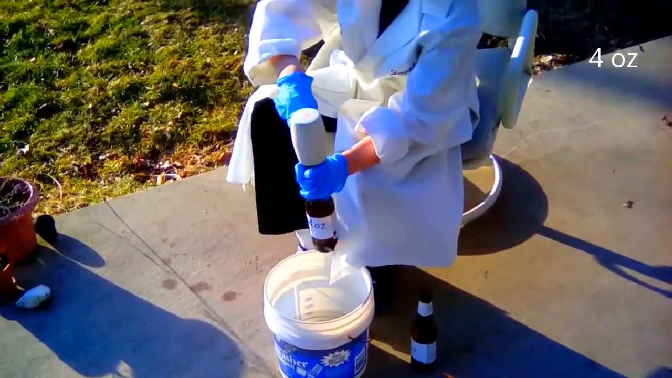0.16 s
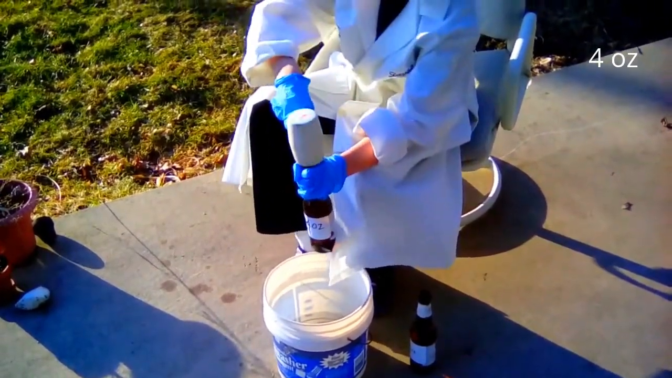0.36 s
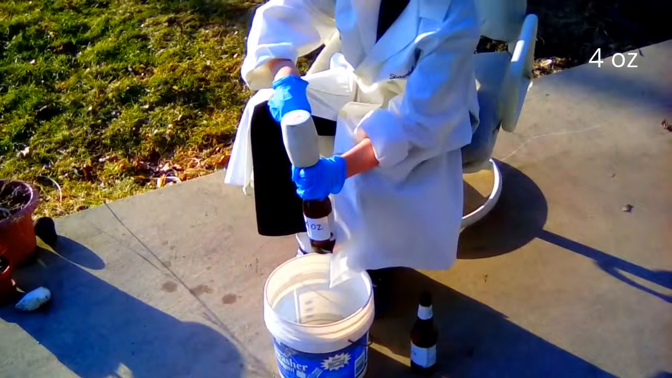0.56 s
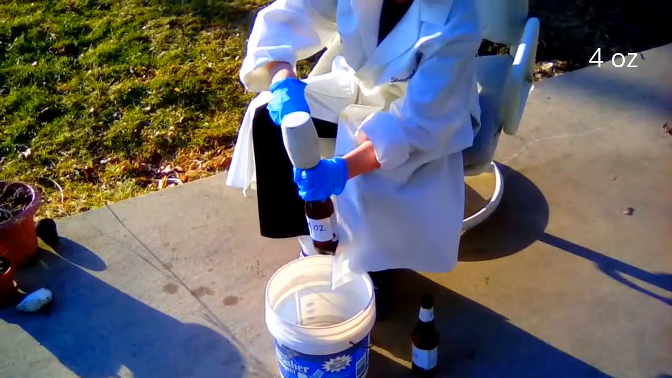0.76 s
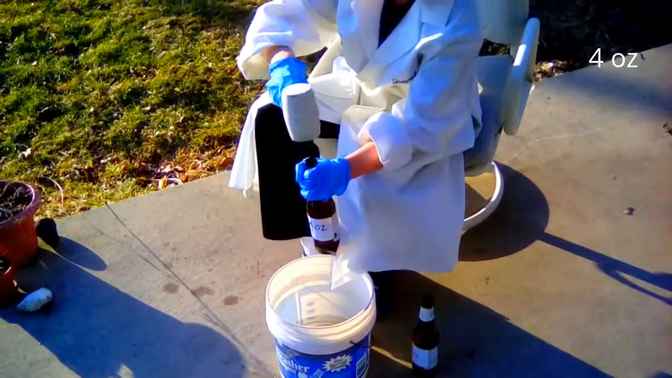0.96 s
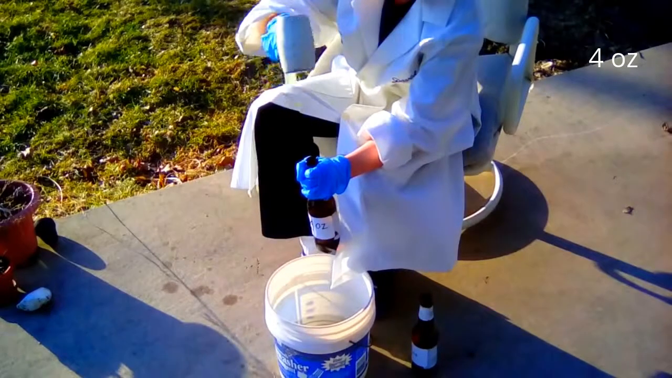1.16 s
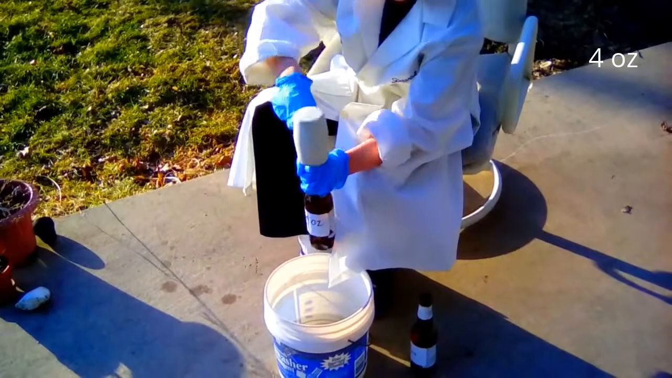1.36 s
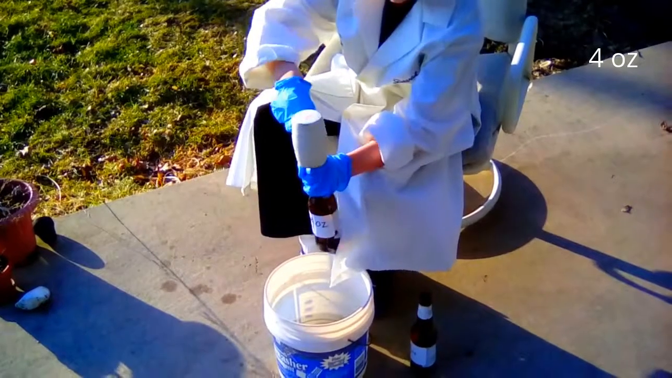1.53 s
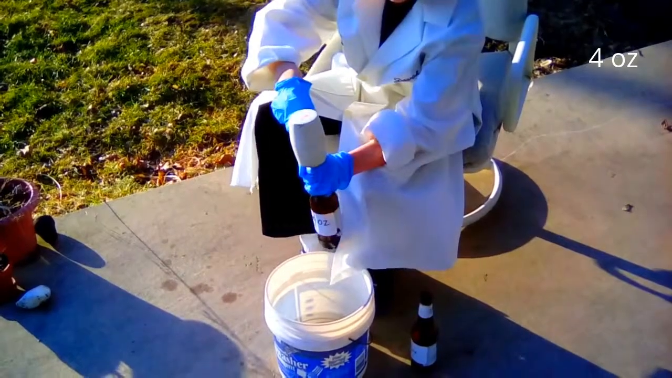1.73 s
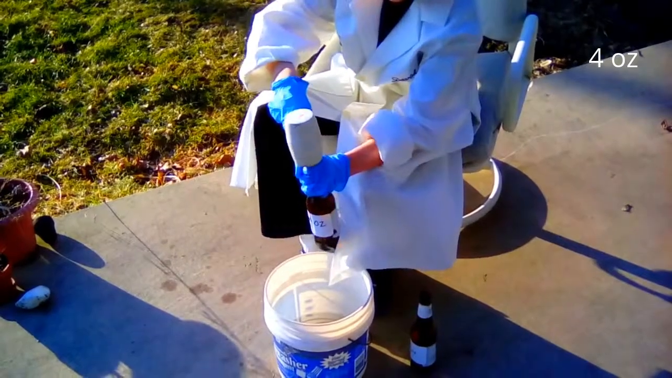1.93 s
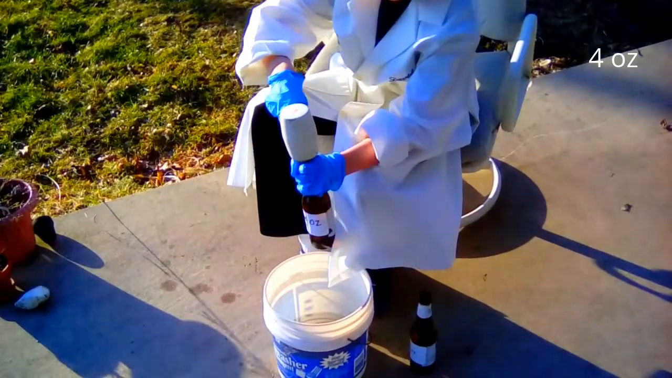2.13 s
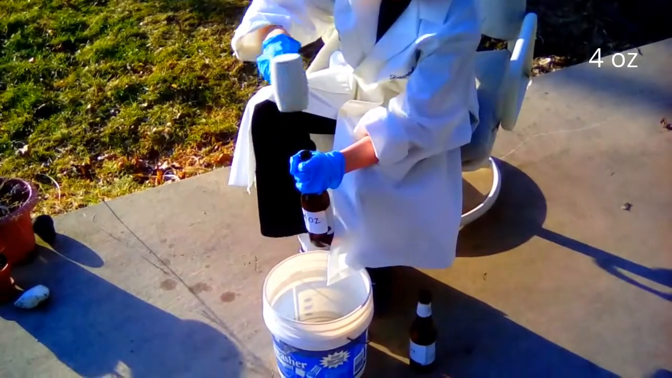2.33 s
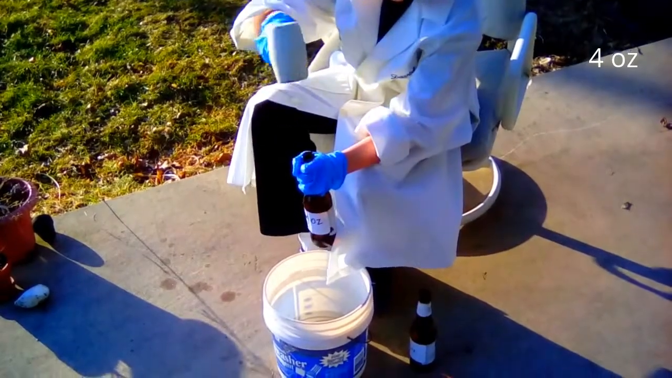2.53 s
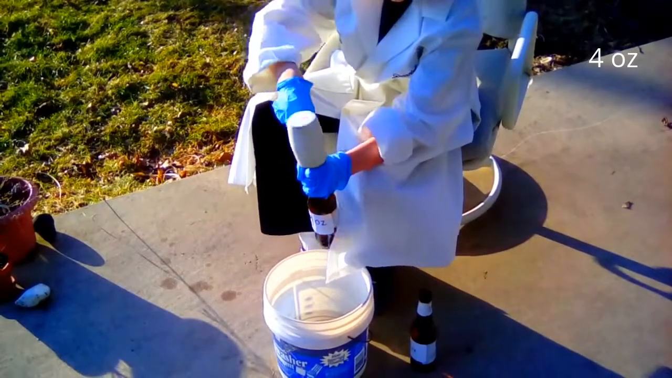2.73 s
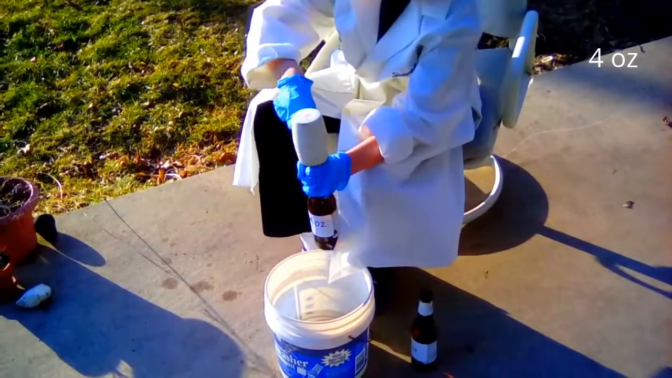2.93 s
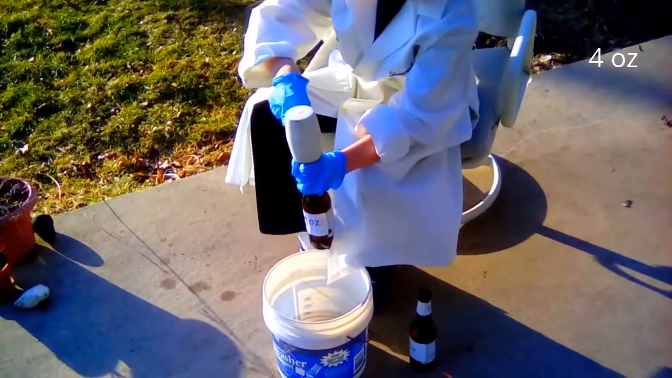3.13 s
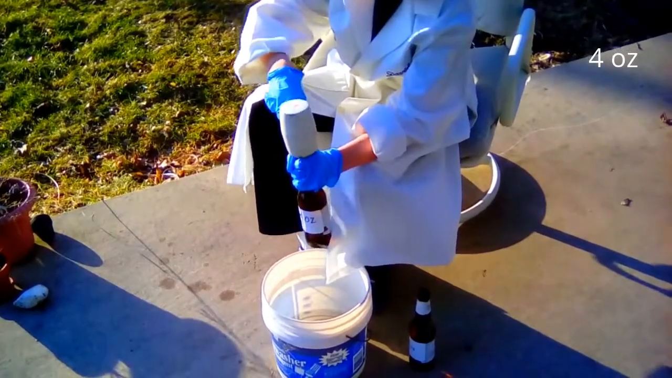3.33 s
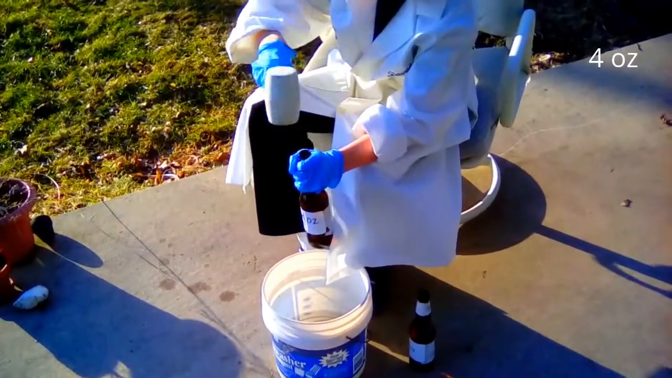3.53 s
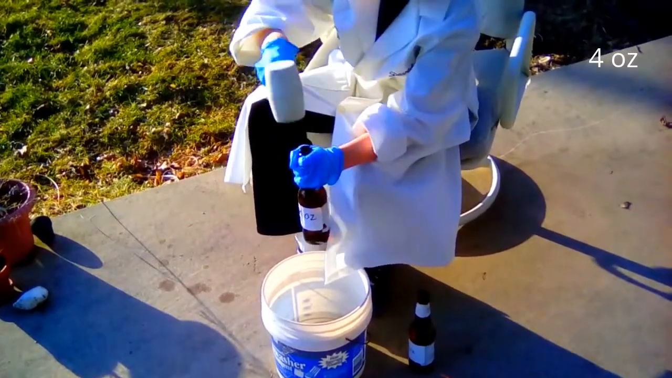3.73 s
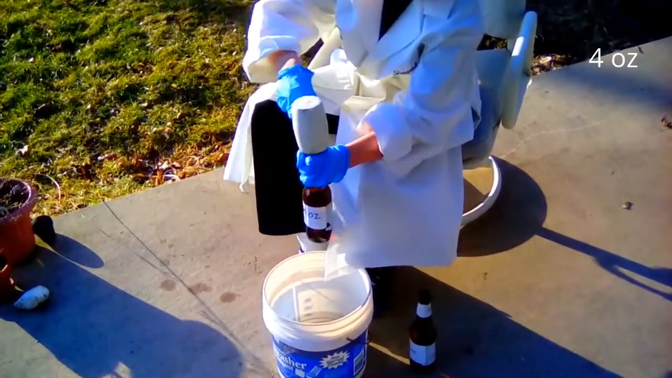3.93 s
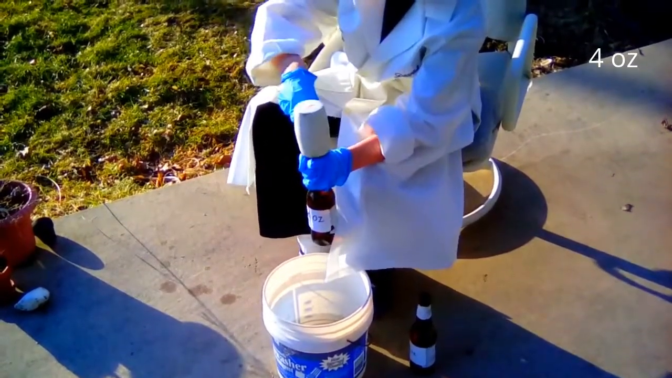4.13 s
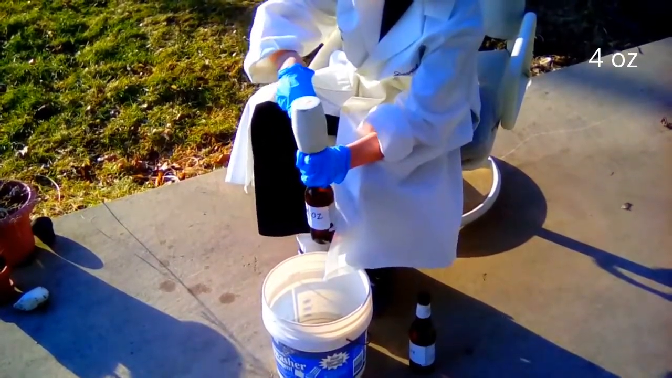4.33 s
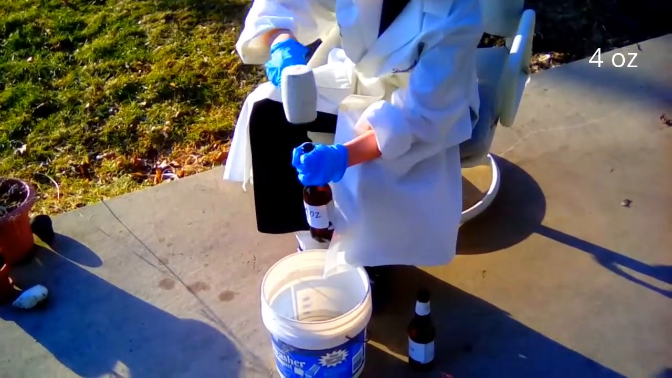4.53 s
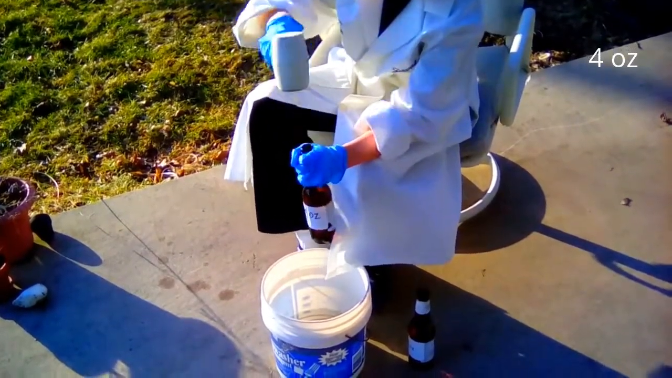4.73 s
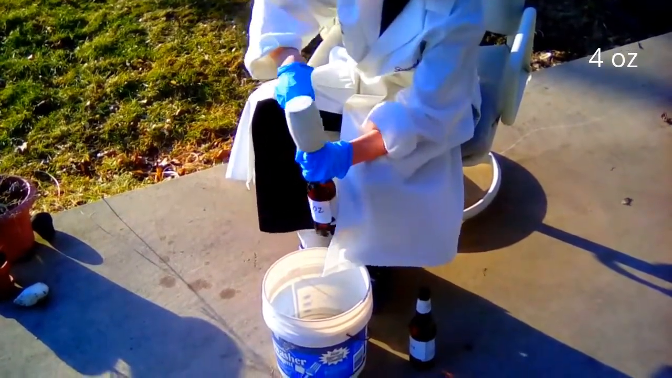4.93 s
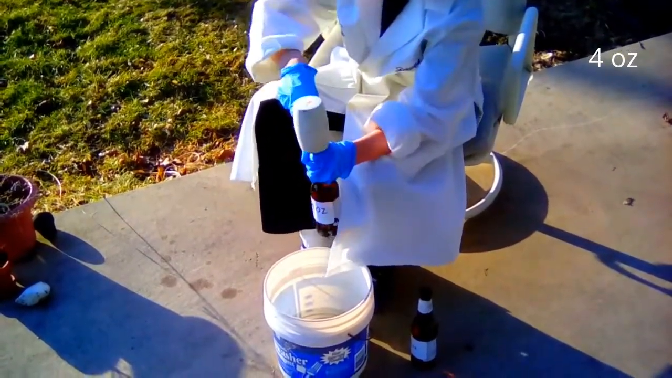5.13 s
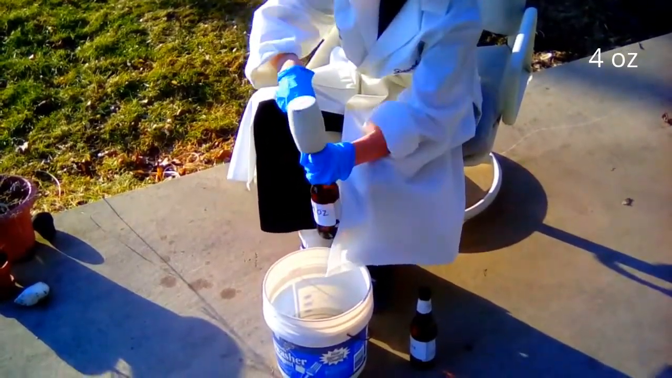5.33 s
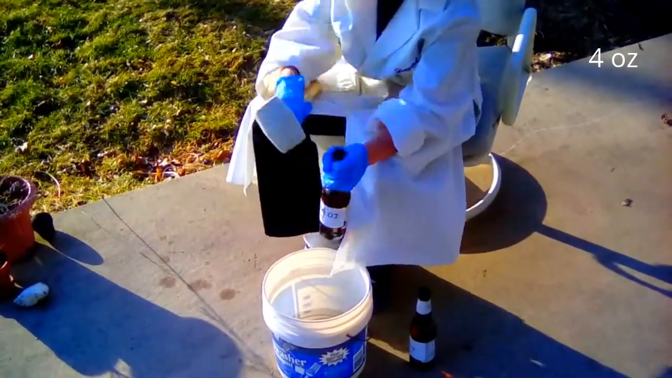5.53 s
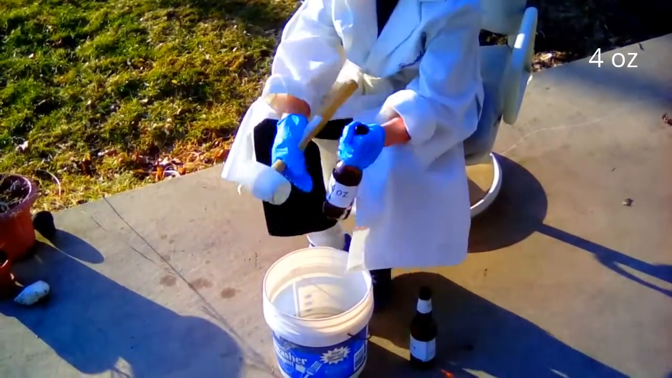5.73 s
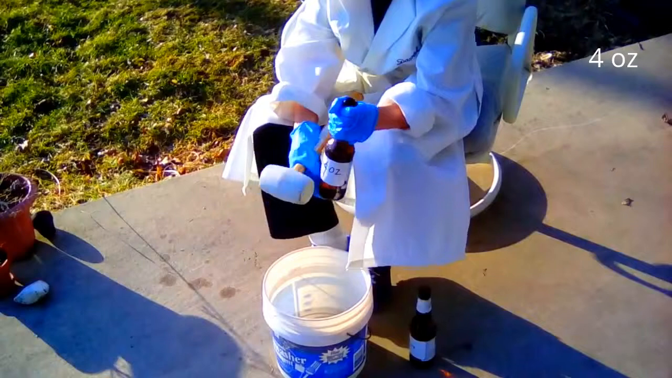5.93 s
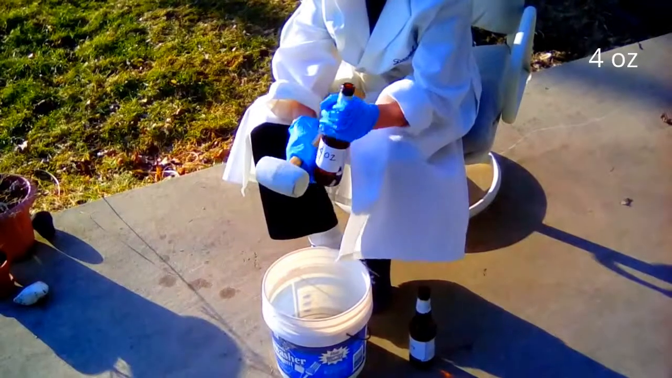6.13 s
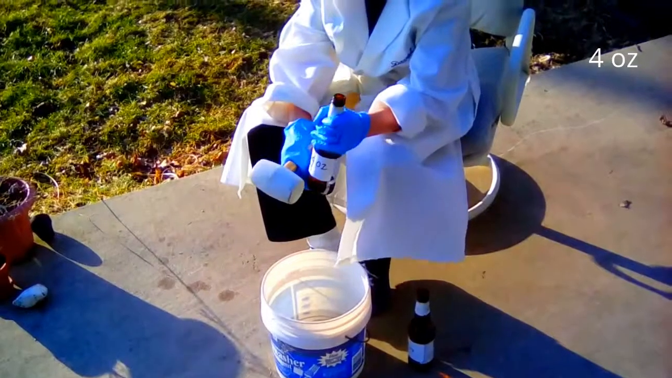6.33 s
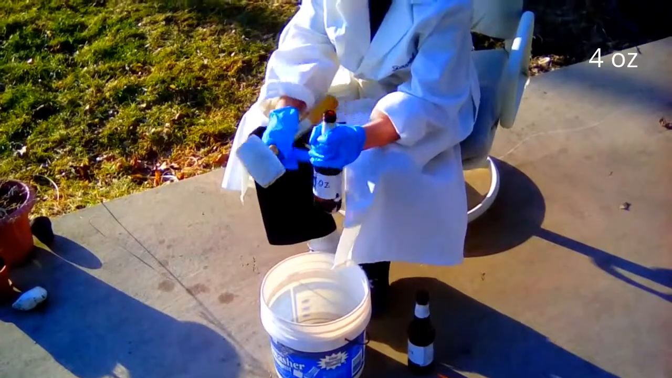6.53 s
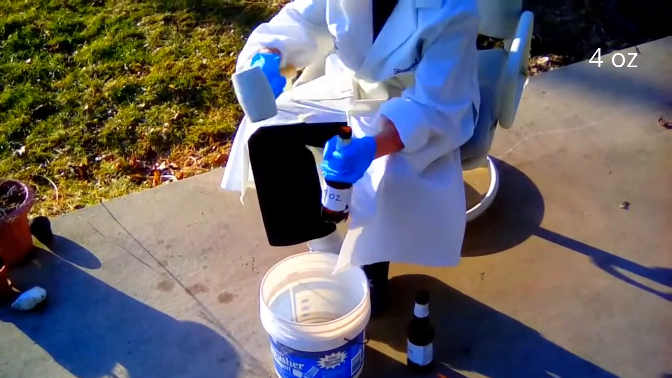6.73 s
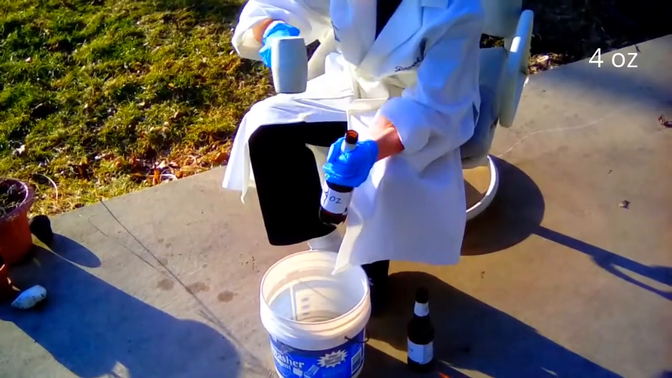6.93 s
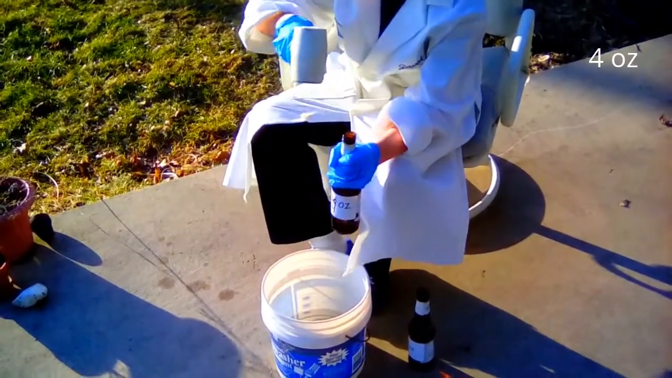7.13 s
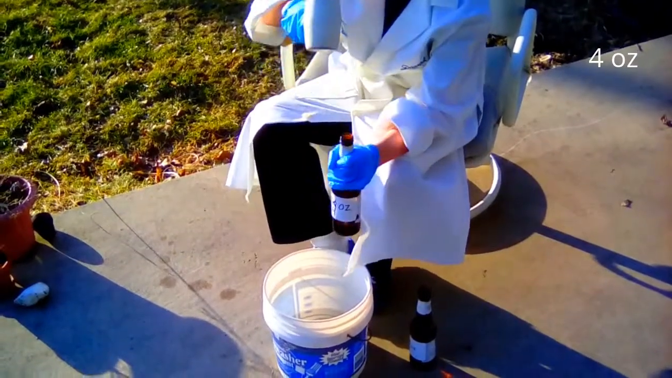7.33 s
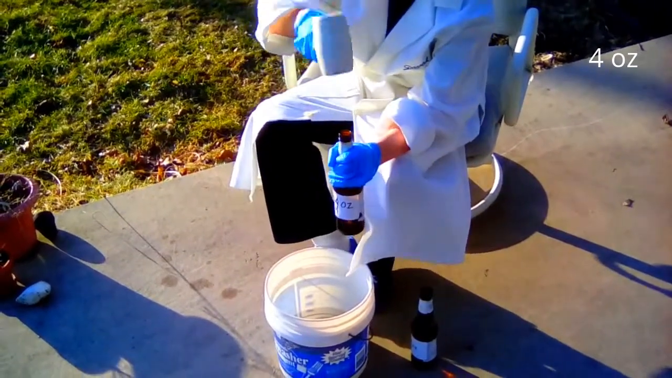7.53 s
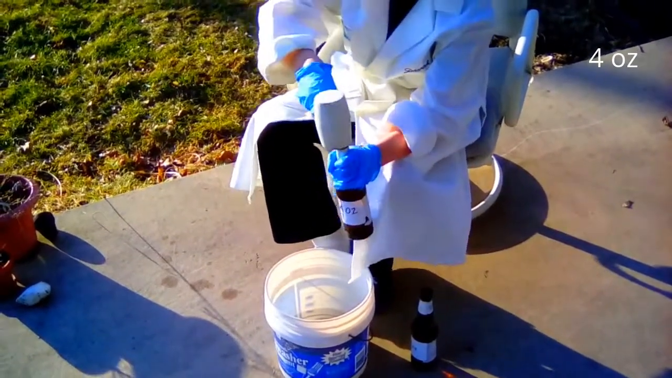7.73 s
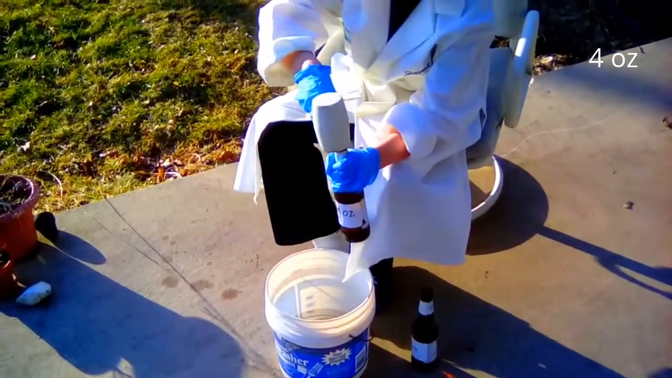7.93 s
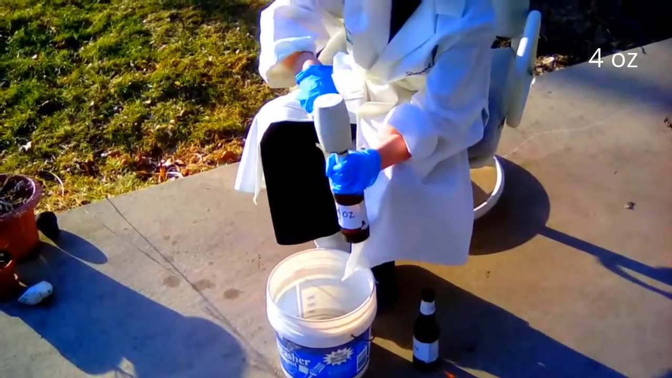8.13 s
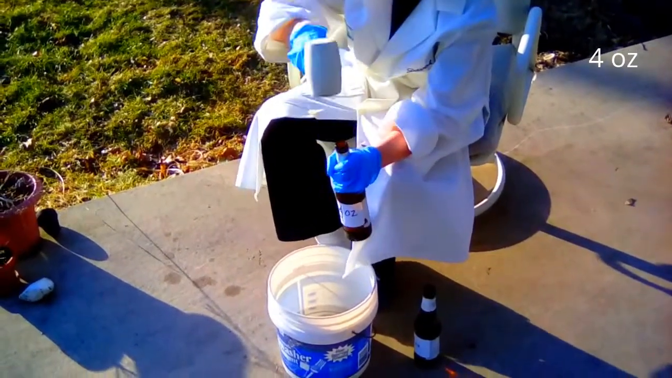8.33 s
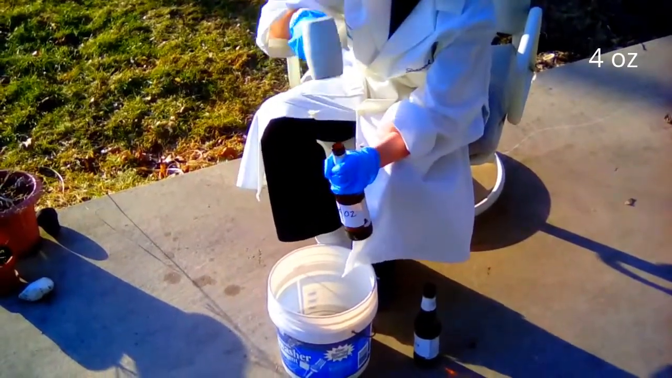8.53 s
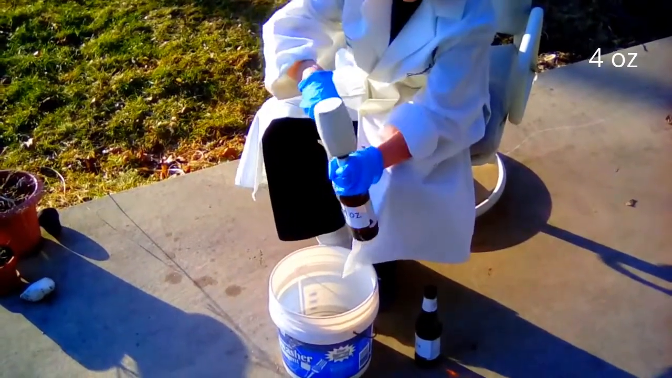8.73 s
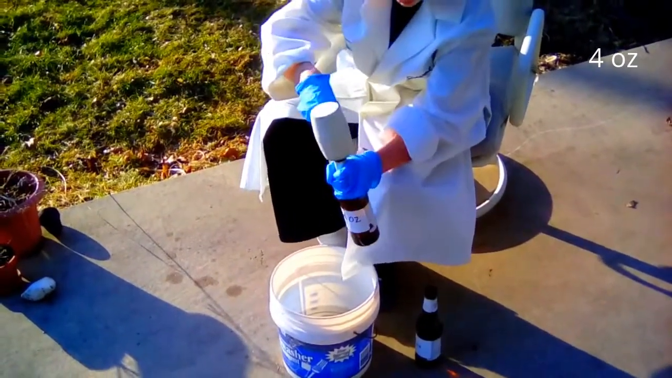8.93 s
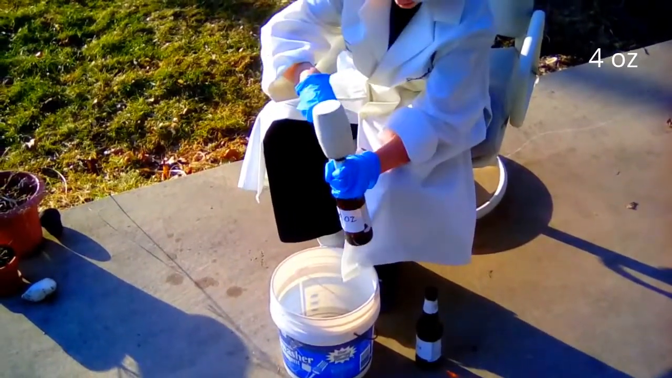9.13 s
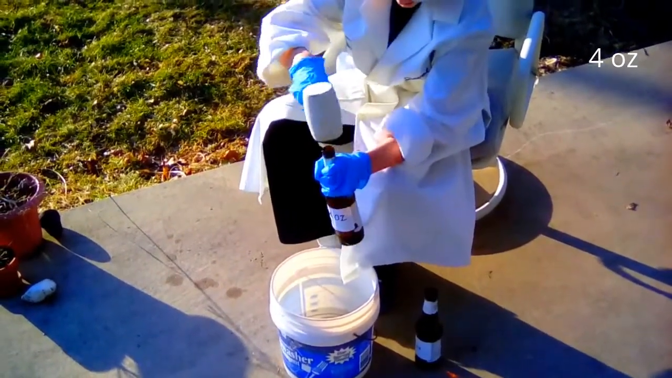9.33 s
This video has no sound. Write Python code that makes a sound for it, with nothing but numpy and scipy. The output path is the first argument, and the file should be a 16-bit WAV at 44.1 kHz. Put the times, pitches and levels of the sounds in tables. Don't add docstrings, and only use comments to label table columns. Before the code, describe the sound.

Spaced mallet knocks on a glass bottle of water crack brightly and ring briefly, with slosh, glove ticks, microphone hiss and fluttering wind.

```python
import sys
import numpy as np
from scipy import signal
from scipy.fft import rfft, irfft
from scipy.io import wavfile

SR = 44100
rng = np.random.default_rng(int(sys.argv[2]) if len(sys.argv) > 2 else 0)


def magnitude_from_level(level_db):
    exponent = np.asarray(level_db, float) / 20
    return 10 ** exponent


def inscribe(sig):
    pcm = np.round(np.clip(np.atleast_2d(sig).T, -1, 1) * 32767)
    wavfile.write(sys.argv[1], SR, pcm.astype(np.int16))


N = 417627


def rms_one(x):
    return x / np.sqrt(np.mean(x ** 2) + 1e-20)


def seconds(length):
    return np.arange(length) / SR


def at_hz(points, hz):
    table_hz, value = np.array(points).T
    return np.interp(np.log(np.maximum(hz, 1)), np.log(table_hz), value)


def coloured(spectrum, size):
    hz = np.fft.rfftfreq(size, 1 / SR)
    white = rfft(rng.standard_normal(size))
    return rms_one(irfft(white * magnitude_from_level(at_hz(spectrum, hz)), size))


def band_filter(order, low, high):
    return signal.butter(order, [low, high], "band", fs=SR, output="sos")


def drift(rate):
    knots = rng.standard_normal(int(N / SR * 40) + 2)
    return np.interp(seconds(N) * rate, np.arange(len(knots)), knots)


def bumps(rows):
    t = seconds(N)
    return sum(magnitude_from_level(db) * np.exp(-((t - s) / length) ** 2) for s, db, length in rows)


def add(out, s, sound):
    i = round(s * SR)
    out[i:i + len(sound)] += sound[:N - i]


def mode(t, hz, db, t60, rise, phase, glide=0):
    shape = (1 - np.exp(-t / max(rise, 1e-4))) * magnitude_from_level(db - 60 * t / t60)
    bend = np.where(t < t60, t * t / t60, 2 * t - t60)
    return shape * np.sin(2 * np.pi * hz * (t + glide * bend) + phase)


def unsteady(t, depth_db, settle):
    flutter = np.interp(t * 90, np.arange(50), rng.standard_normal(50))
    return magnitude_from_level(depth_db * np.minimum(t / settle, 1) * np.clip(flutter, -3, 1))


# time in seconds, flutter level in dB.
GUST = [(0.0, -71), (.3, -69), (.6, -62.5), (.75, -71), (.97, -72.5), (1.1, -61), (1.36, -61.5),
        (1.75, -74), (2.3, -64), (2.6, -77), (3.3, -73), (4.7, -79), (5.1, -69.5), (5.55, -82),
        (6.1, -67.5), (6.45, -77), (7.4, -72.5), (9.47, -86.5)]


def gust_strength():
    return np.interp(seconds(N), *np.transpose(GUST))


# frequency in Hz, level in dB per Hz.
BUFFET_COLOUR = [(15, -18.5), (30, -12.5), (50, -0.5), (75, 3.5), (100, -9.5), (130, -47.5), (300, -88.5)]
# centre in seconds, level in dB, length in seconds.
SHOVES = [
    (0.03, -83, .1),
    (0.796, -77, 0.15),
    (1.466, -60, 0.11),
    (2.087, -78, 0.12),
    (2.42, -70, 0.087),
    (3.698, -66, 0.17),
    (4.85, -68, 0.096),
    (5.08, -74, 0.15),
    (7.02, -69.5, 0.11),
]


def buffet(swing):
    steady = magnitude_from_level(-80.5 + 0.18 * swing + 1.2 * drift(5))
    lumps = magnitude_from_level(1.3 * drift(24))
    return coloured(BUFFET_COLOUR, N) * lumps * (steady + magnitude_from_level(-3.0) * bumps(SHOVES))


# frequency in Hz, level in dB per Hz.
RUMBLE_COLOUR = [(60, -21.5), (85, -5.5), (110, 10.5), (150, 10.5), (190, 4), (260, -38), (400, -45.5),
                 (1200, -87.5)]


def rumble(swing):
    level_db = -68.5 + 0.35 * swing + 2.0 * drift(25) + 3.0 * drift(4)
    return coloured(RUMBLE_COLOUR, N) * magnitude_from_level(level_db)


# frequency in Hz, width in Hz, level in dB.
RESONANCES = [(255, 72, 1), (403.8, 53, -10.5), (530.8, 96, -19.5), (171, 110, -7)]


def resonant_flutter(gust):
    out = 0
    for hz, width, db in RESONANCES:
        r = np.exp(-np.pi * width / SR)
        b = [(1 - r * r) / 2, 0, (r * r - 1) / 2]
        a = [1, -2 * r * np.cos(2 * np.pi * hz / SR), r * r]
        band = signal.lfilter(b, a, signal.lfilter(b, a, rng.standard_normal(N)))
        bright_db = 0.3 * (gust + 70) * np.log2(hz / 270)
        out = out + rms_one(band) * magnitude_from_level(db + bright_db + 3.5 * drift(16))
    return out * magnitude_from_level(gust + 0.5 * drift(6.3))


def wind():
    gust = gust_strength()
    swing = gust - gust.mean()
    return buffet(swing) + rumble(swing) + resonant_flutter(gust)


# frequency in Hz, level in dB per Hz.
HISS_COLOUR = [(200, -21), (330, -13), (520, -12.5), (900, -16.5), (1700, -17.5), (2740, -17),
               (4700, -17.5), (5400, -12), (6300, -17.5), (6900, -24.5), (7600, -27.5), (8400, -31.5),
               (12000, -32.5), (16000, -36)]


def hiss():
    noise = coloured(HISS_COLOUR, N)
    out = noise.copy()
    for low in 280 * 2. ** np.arange(0, 4.5, .5):
        band = signal.sosfiltfilt(band_filter(2, low, low * np.sqrt(2)), noise)
        out += band * .12 * drift(14)
    whine = magnitude_from_level(-96 + 2.2 * drift(22)) * np.sin(2 * np.pi * 6450 * seconds(N))
    return rms_one(out) * magnitude_from_level(-77) + whine


# frequency in Hz, level in dB, t60 in seconds.
MALLET = [(550, -3.5, 0.011), (685.6, 0.5, 0.022), (928, -3, 0.021), (1505, -6.5, 0.013)]


def mallet_thud(t, db):
    return sum(mode(t, hz, db + 7 + level, t60, 0.0019, np.pi) for hz, level, t60 in MALLET)


# frequency in Hz, level in dB per Hz.
CRACK_COLOUR = [(900, -13), (1500, -4), (2400, -11), (3000, -4), (3400, -4.5), (4000, -4.5), (4700, -14),
                (6450, -1), (7300, -9), (8300, -20), (11000, -29), (15500, -40.5)]


def water_crack(t, db):
    late = np.maximum(t - .0017, 0)
    return coloured(CRACK_COLOUR, len(t)) * magnitude_from_level(db - 60 * late / 0.022) * (1 - np.exp(-late / 0.00042))


def hand_and_neck(t, hand_db, neck_db):
    neck = mode(t, 213, neck_db, 0.23, 0.013, 0)
    hand = mode(t, 280, hand_db, 0.097, 0.00022, 0)
    arm = mode(t, 210, hand_db - 12.5, 0.043, 0.0071, 0)
    return neck + hand + arm


# frequency in Hz, level in dB per Hz.
SCATTER_COLOUR = [(200, -7), (600, -6.5), (1000, -2.5), (1700, -16.5), (2800, -8), (3300, -15.5),
                  (4000, -22.5), (5000, -17.5), (6500, -14), (7600, -23.5), (8500, -28), (11000, -41),
                  (15500, -50.5)]
# frequency in Hz, t60 in seconds.
SCATTER_T60 = [(200, 0.13), (1000, 0.14), (3000, .15), (7000, 0.084), (14000, 0.099)]


def scattered_tail(t):
    noise, out = coloured(SCATTER_COLOUR, len(t)), 0
    for low in 150 * 2. ** np.arange(7):
        band = signal.sosfilt(band_filter(2, low, min(2 * low, .45 * SR)), noise)
        out = out + band * magnitude_from_level(-60 * t / at_hz(SCATTER_T60, 1.1 * low))
    return out * (1 - np.exp(-(t / .014) ** 2))


# start in seconds, then thud, crack, hand thump and scattered tail in dB.
BLOWS = [
    (0.044, -37.5, -61, -34.5, -42),
    (1.5498, -23.5, -24, -37.5, -26.5),
    (2.8362, -24, -25.5, -34, -27.5),
    (4.0027, -27.5, -27.5, -33, -28.5),
    (5.065, -33.5, -41.5, -33.5, -35.5),
    (7.8015, -23.5, -23.5, -36, -25),
    (8.8161, -21, -22, -36.5, -25.5),
]
# squeak before contact in dB, boom after it in dB.
NECK_AIR = [
    (-90, -34),
    (-95, -54),
    (-67.5, -48),
    (-63, -50),
    (-84, -35),
    (-63, -37.5),
    (-62.5, -73),
]


def blows():
    bright, rest, t = np.zeros(N), np.zeros(N), seconds(SR // 3)
    squeak_s = 0.0095
    for (s, thud, crack, hand, tail), (squeak, neck) in zip(BLOWS, NECK_AIR):
        add(bright, s, mallet_thud(t, thud) + water_crack(t, crack))
        add(bright, s - .0003, mode(t, 2500, thud - 6.0, 0.00087, .0001, 0))
        add(rest, s, hand_and_neck(t, hand, neck) + magnitude_from_level(tail - 4.0) * scattered_tail(t))
        add(rest, s - squeak_s, mode(t[:round(squeak_s * SR)], 6650, squeak, 0.93, .001, 0))
    return bright, rest


# pitch ratio, level in dB, t60 ratio, build-up in seconds.
WALL = [(1.0, 0, 1.0, .011), (.966, -19, 2.0, .03), (1.008, -35, 5.5, .04), (.785, -20, 1.0, .018)]
# pitch in Hz, level in dB, t60 in seconds, pitch slide as a share.
RINGS = [
    (2700, -70, .1, 0.0),
    (2580, -33, .12, .05),
    (2740, -28, .15, 0.0),
    (2640, -38, .15, .03),
    (2700, -46, .14, 0.0),
    (2715, -25, .11, -.01),
    (2785, -23, .1, -.022),
]
# frequency in Hz, level in dB, t60 in seconds, build-up in seconds.
SHOULDER = [(3620, -13, .1, .005), (3830, -2, .07, .002), (4035, 0, .045, .001), (4010, -29, .33, .012)]
LIP = [(5800, -3, .03, .001), (6335, 0, .065, .001), (6365, -26, .18, .012), (6930, -5, .025, .001)]
KNOCK = [(1970, -9, .025, .001), (2150, -15, .07, .001), (2960, -7, .035, .001), (3400, -15, .022, .001),
         (4450, -15, .04, .001)]
REBOUND = [(2945, 0, .04, .0015), (3600, -11, .035, .002), (2130, -16, .11, .012)]
# knock, shoulder, lip in dB, ring length ratio, rebound in dB.
GRIPS = [
    (-50, -57, -76, 1.0, -72),
    (-19.5, -40, -31.5, 0.58, -29.5),
    (-21.5, -29.5, -28, 0.79, -47),
    (-26, -29, -27, 0.54, -27.5),
    (-38, -41.5, -47.5, 0.69, -64),
    (-27.5, -33.5, -28, 0.98, -48),
    (-23, -47.5, -37, 0.71, -43.5),
]


def glass():
    out, t = np.zeros(N), seconds(SR // 2)
    for (s, *_), (hz, wall_db, t60, slide), grip in zip(BLOWS, RINGS, GRIPS):
        knock_db, shoulder_db, lip_db, loose, rebound_db = grip
        modes = [(0, hz * ratio, wall_db + db, t60 * longer, rise, slide / longer ** .5)
                 for ratio, db, longer, rise in WALL]
        parts = [(SHOULDER, shoulder_db, 0), (LIP, lip_db, 0), (KNOCK, knock_db, 0),
                 (REBOUND, rebound_db, .0145)]
        for part, part_db, lag in parts:
            for f, db, decay, rise in part:
                detune, luck_db = rng.standard_normal(2) * (.004, 1.5)
                modes.append((lag, f * (1 + detune), part_db + db + luck_db, decay * loose, rise, 0))
        for lag, f, db, decay, rise, glide in modes:
            heard = t[:round(decay * SR)]
            tone = mode(heard, f, db, decay, rise, 0, glide)
            add(out, s + .0022 + lag, tone * unsteady(heard, depth_db=5.5, settle=0.09))
    return out


# frequency in Hz, level in dB, t60 in seconds.
GLOVE = [(3070, 0, 0.014), (2320, -7, 0.0066), (3620, -10, .01), (2780, 1, .01), (1730, -3, 0.0054),
         (5670, -3, 0.0076), (610, -8, 0.0093)]


def glove_tick(db, spread_db):
    t, out = seconds(SR // 20), 0
    for hz, level, t60 in GLOVE:
        detune, luck, phase = rng.standard_normal(3)
        out = out + mode(t, hz * (1 + detune / 100), db + level + spread_db * luck, t60, 0.00018, 2 * phase)
    return out


# start in seconds, level in dB, pitch in Hz, t60 in seconds.
CLINKS = [(0.044, -45, 4354, 0.069), (0.0433, -45, 1480, 0.029), (0.0433, -43.5, 1990, 0.021),
          (0.39, -50.5, 2734, 0.08), (.41, -70, 3930, 0.13), (1.649, -45, 2136, 0.046),
          (1.650, -41.5, 2880, 0.036), (5.169, -70, 1343, 0.13), (5.171, -57.5, 2770, 0.044),
          (5.414, -65.5, 2810, 0.054), (9.019, -47, 2805, 0.044), (9.02, -68, 3930, 0.069),
          (9.14, -67, 2690, 0.23)]
# start in seconds, level in dB, pitch in Hz, t60 in seconds.
GURGLES = [(0.476, -75, 1034, 0.12), (.49, -70, 5040, 0.16), (1.87, -62, 6300, .08),
           (3.155, -68.5, 6100, 0.22), (4.30, -63, 720, 0.07), (4.301, -58, 1177, 0.071),
           (4.308, -66, 2860, 0.18), (4.40, -72, 2340, 0.1), (5.19, -65, 2030, .08),
           (8.145, -64, 2887, 0.21), (8.251, -67.5, 1580, .09), (8.366, -52, 219, 0.11),
           (8.39, -71.5, 1400, 0.074), (9.122, -65, 2770, 0.22), (9.13, -60.5, 2030, 0.082),
           (9.135, -63, 1267, 0.15)]


def slosh():
    out, t = np.zeros(N), seconds(SR // 7)
    # rows, rise in seconds, upward glide, spread of the split tones
    kinds = [(CLINKS, 0.0034, 0.018, .02), (GURGLES, 0.011, 0.048, .032)]
    for rows, rise, glide, spread in kinds:
        for s, db, hz, t60 in rows:
            for side, loss_db in (0, 1), (0, -7.0), (-1, -4.5), (3.0, -14.0):
                tone = mode(t, hz * (1 + side * spread), db + loss_db, t60, rise, side, glide)
                add(out, s, tone * unsteady(t, depth_db=4.5, settle=0.017))
    for s, db, _, _ in CLINKS[3:]:
        add(out, s, glove_tick(db - 12.0, spread_db=3.5))
    return out


# delay in seconds, level in dB.
ECHOES = [(.0036, -8), (.0158, -10), (.0195, -14), (.031, -25.5)]


def patio(x):
    out, dull = x.copy(), signal.sosfilt(band_filter(1, 350, 9000), x)
    for delay, db in ECHOES:
        add(out, delay, magnitude_from_level(db) * dull)
    t = seconds(SR)
    yard = rng.standard_normal(SR) * magnitude_from_level(-53 - 60 * t / .6) * (t > .02)
    thin = signal.sosfilt(band_filter(2, 1200, 7500), yard)
    return out + signal.fftconvolve(x, thin)[:N]


# time in seconds, pitch in Hz, level in dB.
BIRD = [
    (.765, 6450, -98),
    (.78, 6900, -74),
    (.80, 7260, -76),
    (.83, 7200, -82),
    (.87, 7250, -92),
]


def bird():
    s, hz, db = np.transpose(BIRD)
    t = seconds(N)
    phase = 2 * np.pi * np.cumsum(np.interp(t, s, hz)) / SR
    return magnitude_from_level(np.interp(t, s, db, -200, -200)) * np.sin(phase)


# frequency in Hz, level in dB per Hz.
COAT_COLOUR = [(300, 2), (700, 4), (1600, -0.5), (2700, 0), (4000, -20), (8000, -33)]
# centre in seconds, level in dB, length in seconds.
RUSTLES = [
    (4.355, -81, 0.078),
    (5.897, -86, 0.13),
    (6.102, -83, 0.14),
    (6.777, -82.5, 0.071),
    (8.28, -83.5, 0.16),
]


def coat():
    return coloured(COAT_COLOUR, N) * magnitude_from_level(4.9 * drift(35)) * bumps(RUSTLES)


# start in seconds, peak level in dB.
TICKS = [
    (5.8631, -62),
    (6.1804, -53),
    (6.4248, -55),
    (6.5954, -52),
    (6.645, -61),
    (7.161, -60),
]


def gloves():
    out = np.zeros(N)
    for s, db in TICKS:
        add(out, s, glove_tick(db - 7.5, spread_db=1.2))
    return out


def scene():
    bright, rest = blows()
    echoing = patio(bright + glass() + slosh() + gloves())
    return (echoing + rest + bird() + wind() + hiss() + coat())[None]


def top_cut(x):
    return signal.sosfilt(signal.butter(12, 15750, fs=SR, output="sos"), x)


def record(dry):
    return top_cut(dry)


dry = scene()
out = record(dry)
inscribe(out)
```